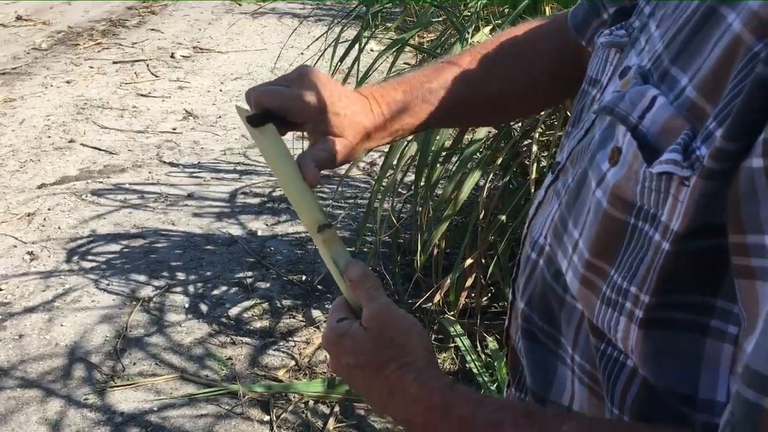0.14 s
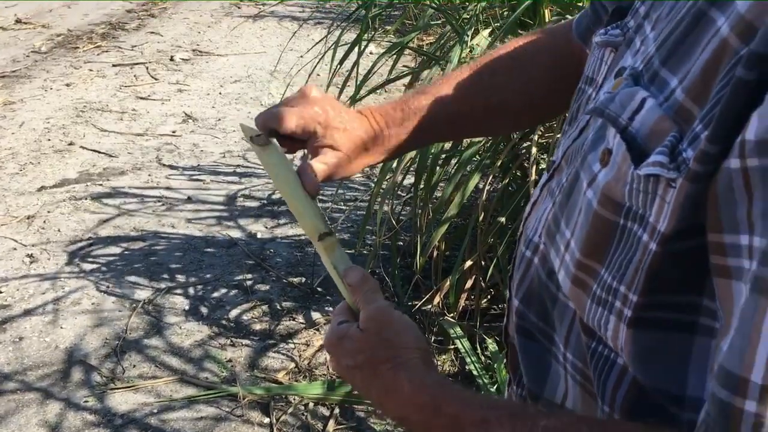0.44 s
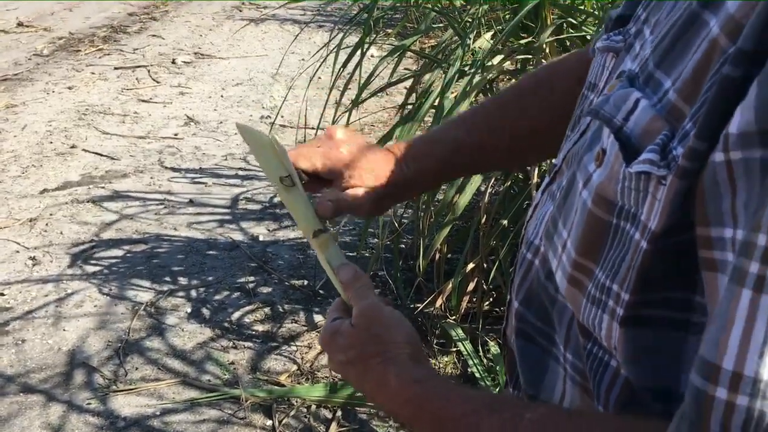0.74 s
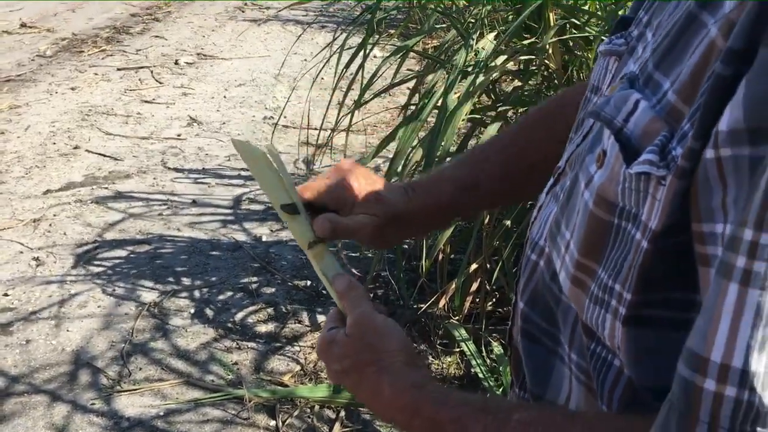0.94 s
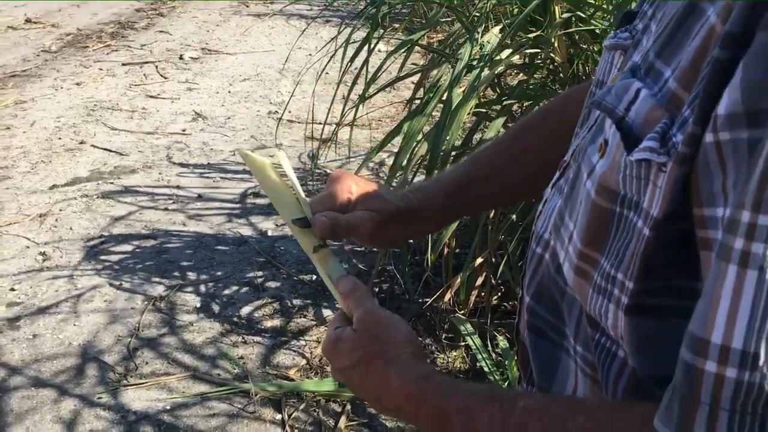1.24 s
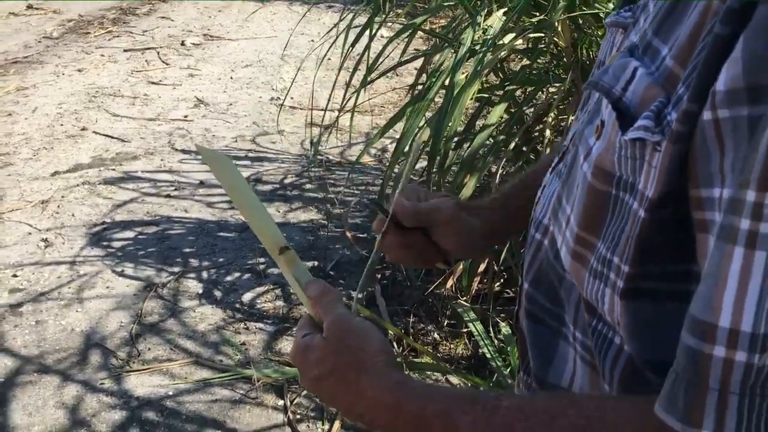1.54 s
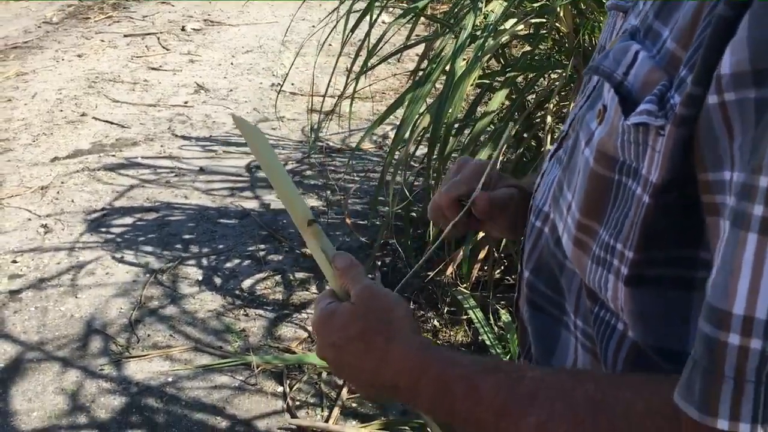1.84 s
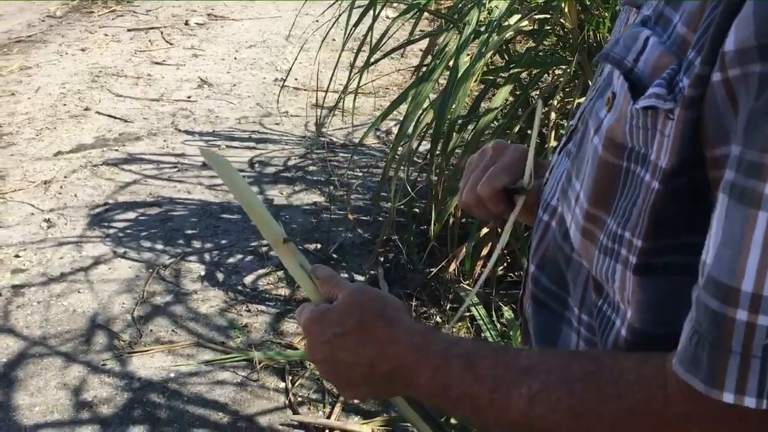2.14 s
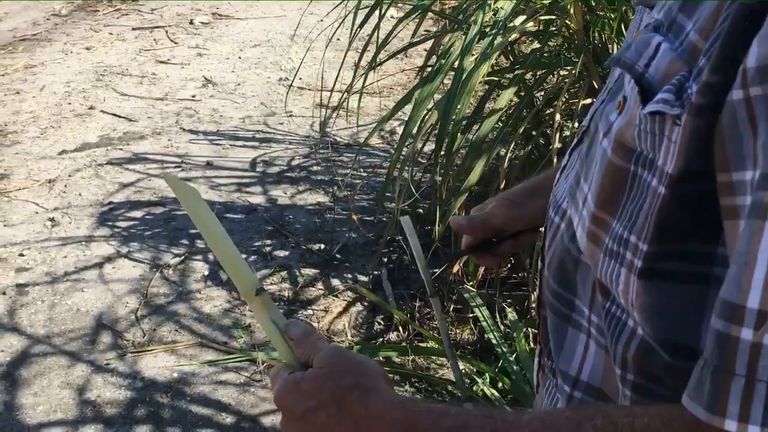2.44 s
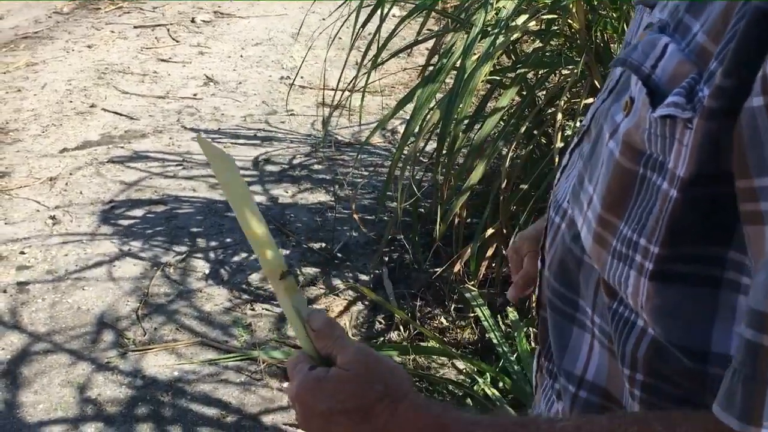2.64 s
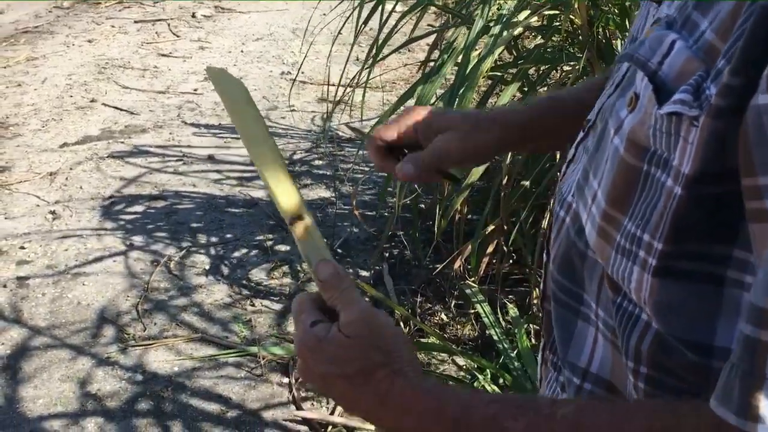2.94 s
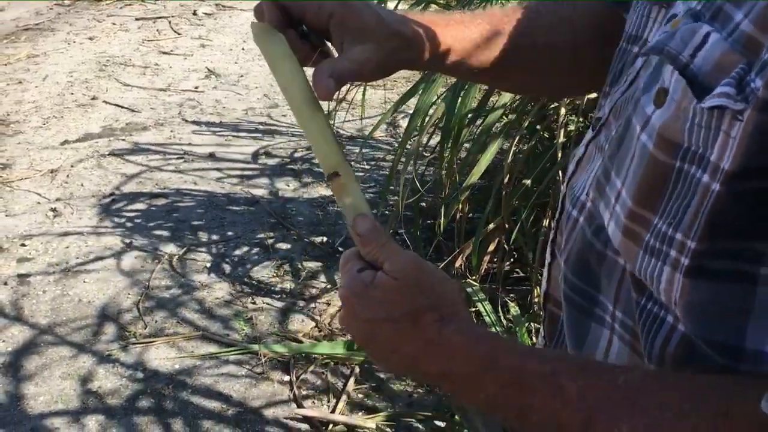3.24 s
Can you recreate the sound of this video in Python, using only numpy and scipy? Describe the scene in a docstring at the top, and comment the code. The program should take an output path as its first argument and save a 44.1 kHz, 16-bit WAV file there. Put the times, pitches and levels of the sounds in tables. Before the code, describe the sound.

A small knife peels sugarcane, hard rind fibres snapping and tearing in bursts, with woody knocks outdoors.

```python
"""A small knife peels a sugarcane stalk outdoors, close to the microphone.
A slowly rising low hum, faint hiss, stray ticks and rustling sleeves and leaves run throughout.
Rind fibres snap, the blade slices under the hard rind with a rasp, and stalk and strip knock.
The strip splits away in denser runs of snaps with woody notes and a thin squeak.
It tears free with a twang and is tossed onto dry litter with hard knocks and more twangs."""
import sys
import numpy as np
from scipy import signal
from scipy.fft import rfft, irfft, next_fast_len
from scipy.io import wavfile
from scipy.ndimage import map_coordinates

SR = 44100
rng = np.random.default_rng(int(sys.argv[2]) if len(sys.argv) > 2 else 0)


def pcm_store(signal):
    """Save signal as 16-bit PCM."""
    levels = np.round(np.clip(np.atleast_2d(signal), -1, 1) * 32767)
    wavfile.write(sys.argv[1], SR, levels.astype(np.int16).T)


N = 149940
CUTOFF_HZ = 16200   # top of the microphone's range


def from_db(db):
    """Decibels to gain."""
    return 10 ** (np.asarray(db) / 20)


def rms_one(x):
    """Scale to unit rms."""
    return x / np.sqrt(np.mean(x ** 2) + 1e-20)


def clock():
    """Time of every sample, in seconds."""
    return np.arange(N) / SR


def drift(rate_hz):
    """Random wander of spread 1: noise through two equal low-pass poles at rate_hz."""
    step = 40   # samples between drawn points
    pole = np.exp(-2 * np.pi * rate_hz * step / SR)
    noise = rng.standard_normal(N // step + 2002)
    slow = signal.lfilter([1], [1, -2 * pole, pole * pole], noise)[2000:]   # skip the filter's start
    return np.interp(np.arange(N) / step, np.arange(len(slow)), rms_one(slow))


def causal(gain, size):
    """The minimum-phase response with this gain, folded from the cepstrum."""
    cepstrum = irfft(np.log(gain + 1e-9), size)
    cepstrum[1:size // 2] *= 2
    cepstrum[size // 2 + 1:] = 0
    return np.exp(rfft(cepstrum))


def colour(x, points, tilt_db=0):
    """Causal filter through (Hz, dB) points, tilted per octave; keeps the power of white noise."""
    size = next_fast_len(len(x), real=True)
    hz, db = np.transpose(points)
    octaves = np.log2(np.maximum(np.fft.rfftfreq(size, 1 / SR), 1))
    curve_db = np.interp(octaves, np.log2(hz), db + tilt_db * np.log2(hz))
    steep_top = np.sqrt(1 + (2 ** octaves / CUTOFF_HZ) ** 60)
    gain = rms_one(from_db(curve_db) / steep_top)
    return irfft(rfft(x, size) * causal(gain, size), size)[:len(x)]


def add(out, s, sound):
    """Mix a sound in at time s."""
    start = max(int(s * SR), 0)
    out[start:start + len(sound)] += sound[:max(N - start, 0)]


def grains(rate_per_s, spread_db, smooth, size):
    """Tiny fibre clicks of uneven strength on a share of smooth friction noise."""
    happens = rng.random(size) < rate_per_s / SR
    strength = from_db(spread_db * np.minimum(rng.exponential(1, size), 4))
    clicks = happens * strength * rng.choice([-1, 1], size)
    return rms_one(rms_one(clicks) + smooth * rng.standard_normal(size))


# Spectrum of the outdoor air around the microphone. Each row: frequency in Hz, level in dB.
AIR_COLOUR = [(20, -44), (38, -1), (65, 8), (90, 2.5), (125, -6), (170, -14), (300, -15.5), (700, -25.5),
              (1300, -22), (2200, -23.5), (3200, -25.5), (6000, -31), (10000, -28), (15500, -31)]
AIR_DB = -55.5
HUM_HZ, HUM_DB, HUM_RISE_DB_PER_S = 99, -55.5, 1.65   # the level is reached halfway through


def background():
    """A low hum wavering in pitch and level, in noise shaped as rumble and faint outdoor hiss."""
    phase = 2 * np.pi * np.cumsum(HUM_HZ + 0.57 * drift(6.4)) / SR
    rise_db = HUM_RISE_DB_PER_S * (clock() - clock().mean())
    hum = np.sqrt(2) * np.sin(phase) * from_db(HUM_DB + rise_db + 0.63 * drift(14))
    return hum + from_db(AIR_DB) * colour(rng.standard_normal(N), AIR_COLOUR)


# Spectrum of stray ticks and of the later knocks. Each row: frequency in Hz, level in dB.
KNOCK_COLOUR = [(60, -23), (160, -18), (330, -16), (750, -15), (1200, -5.5), (2300, 4), (2900, -4.5),
                (4000, -1.5), (5500, -1), (8300, 3), (10500, -5), (12500, -4), (15500, -21)]
STRAY_TICKS_PER_S, STRAY_DB, STRAY_SPREAD_DB = 160, -68, 3.5


def stray_ticks():
    """Loose fibres and dry leaves tick all the while, faintly and at random."""
    ticks = grains(STRAY_TICKS_PER_S, STRAY_SPREAD_DB, smooth=0, size=N)
    return from_db(STRAY_DB) * colour(ticks, KNOCK_COLOUR, tilt_db=-0.5)


# Sleeves, leaves and the loose strip rustle as the arm moves. Each row: peak in seconds,
# level in dB, rise in seconds, fall in seconds, tilt in dB per octave.
RUSTLES = [(.16, -51.5, 0.12, 0.15, 1.8), (.34, -51, 0.063, 0.065, 1.5), (.351, -49, 0.011, 0.0046, 8),
           (.845, -59.5, 0.039, 0.026, -0.5), (1.17, -63.5, 0.018, 0.028, 3),
           (1.368, -54.5, 0.024, 0.028, 4), (1.437, -47.5, 0.019, 0.02, 7), (1.608, -48, 0.052, 0.047, 4),
           (1.69, -51.5, 0.0084, 0.047, 2.5), (1.85, -48, 0.068, 0.13, 2.5), (2.019, -47.5, 0.04, 0.028, 2),
           (2.305, -49.5, 0.094, 0.065, 0.5), (2.409, -49.5, 0.016, 0.15, 2.5),
           (2.72, -44.5, 0.12, 0.096, 2), (2.736, -37.5, 0.033, 0.024, 1), (2.778, -40.5, 0.014, 0.022, 2),
           (2.899, -38.5, 0.026, 0.038, 3), (3.01, -50.5, 0.074, 0.17, 1.5),
           (3.204, -41.5, 0.011, 0.021, 2.5), (3.371, -59, 0.073, 0.093, 3)]
# Spectrum of a rustle. Each row: frequency in Hz, level in dB.
RUSTLE_COLOUR = [(120, -4.5), (300, -4.5), (690, -2), (950, -1.5), (1600, 0), (2280, 5.5), (2800, 1),
                 (4200, -1.5), (5400, -3), (7000, -5.5), (9300, -4.5), (10500, -8.5), (12500, -11.5),
                 (15500, -21)]
RUSTLE_GRAINS_PER_S = 1700


def rustles(size=32768):
    """Each movement swells and fades as a soft crackle of fibre clicks and friction noise."""
    out, t = np.zeros(N), (np.arange(size) - size // 2) / SR   # t = 0 at the peak
    for s, db, rise, fall, tilt_db in RUSTLES:
        shape = from_db(db) / (1 + (t / np.where(t < 0, rise, fall)) ** 2 / 2) ** 2
        crackle = grains(RUSTLE_GRAINS_PER_S, spread_db=3.0, smooth=0.79, size=size)
        sound = colour(shape * crackle, RUSTLE_COLOUR, tilt_db)
        add(out, s + t[0], sound[s + t >= 0])
    return out * from_db(1.9 * drift(36))


def patchy(x, depth_db, rate_hz, count=12):
    """Each band flickers by itself, by depth_db, as different fibres catch."""
    spectrum, hz = rfft(x), np.fft.rfftfreq(N, 1 / SR)
    centres_hz = np.geomspace(600, 15000, count)
    out = np.zeros(N)
    for weights in np.eye(count):   # overlapping bands that sum to the whole
        band = irfft(spectrum * np.interp(hz, centres_hz, weights), N)
        out += band * from_db(depth_db * np.clip(drift(rate_hz), -2, 2))
    return out


# Resonances of the stalk under knocks and rubbing. Each row: frequency in Hz, width in Hz,
# level in dB against the direct sound it is added to.
STALK_MODES = [(700, 56, 3.5), (2300, 130, -10), (4340, 69, -4.5), (5400, 67, -4), (6050, 48, -2),
               (7200, 40, -18)]


def stalk(x):
    """The stalk rings along with whatever touches it, one resonator a mode."""
    out = x
    for hz, width, db in STALK_MODES:
        out = out + from_db(db) * signal.lfilter(*signal.iirpeak(hz, hz / width, fs=SR), x)
    return out


# Rind fibres snap close by. Each row: start in seconds, level in dB, body in dB (full below
# 4.5 kHz, none above 8.5), top in dB (none below 9 kHz, full above 12.5), decay in ms.
SNAPS = [(0.025, -40.5, 16, 4, 0.89), (0.1452, -36, 6, -13, 1.8), (0.197, -39.5, -4, -1, 1.1),
         (.6378, -45, 3, -4, 0.55), (.6528, -34, -3, 0, .8), (.7610, -37.5, 20, -16, 2.8),
         (0.847, -41.5, 9, -34, 1.9), (1.0385, -34.5, 6, -9, 1.6), (1.066, -42, 15, -5, 1.9),
         (1.3612, -44, 16, 2, 1.7), (1.4210, -34, -6, -2, 0.65), (1.4288, -19.5, 10, 8, 0.55),
         (1.4450, -29, -11, 0, 1.4), (1.461, -23.5, 13.5, 2.5, 0.81), (1.4728, -27.5, 15, 4, 0.97),
         (1.4849, -25, 2, -3, 0.9), (1.5078, -20, 14.5, -6, 2.9), (1.523, -31, 2, 7, .8),
         (1.539, -31, -6, 8, 1.5), (1.6835, -37, 15, 5, 0.85), (1.815, -31.5, 6, 3.5, 0.67),
         (1.8182, -27.5, 1, 1, 0.78), (1.8349, -30, -3, -2, 0.64), (1.8371, -28.5, 2, 4, .7),
         (1.852, -28, -11, -25, 0.65), (1.8711, -28.5, -10, -8, .5), (1.8953, -22, -12.5, -9, 0.54),
         (1.9012, -26, 14, 3, 0.71), (1.914, -27, -1, 3, 0.81), (2, -27.5, 8, 7, 0.55),
         (2.003, -29, 0, -2, .7), (2.006, -23, 3, 1.5, 0.37), (2.0098, -16, 3, 0.5, 1.1),
         (2.016, -21.5, -2, -5, 0.74), (2.0181, -33, -13, -9, 0.53), (2.0204, -19, -3, -2, 0.88),
         (2.0346, -36, 3, -5, .7), (2.043, -41, 0, -1, .6), (2.1623, -35, 7, -1, 0.59),
         (2.1861, -34, 9, 1, 0.67), (2.188, -31, 8, -1, 2.8), (2.225, -29, 6, -2, .6),
         (2.2371, -35, -4, 0, 0.59), (2.2476, -30, 0, 0, 1.2), (2.251, -19, -0.5, -1, 0.76),
         (2.2524, -19.5, 8, -8, 2.5), (2.2543, -25.5, 8, 1, 1.6), (2.266, -28, 0, -1, 1.6),
         (2.2766, -32, -4, 0, .7), (2.2872, -36, -9, 2, .9), (2.3530, -43, 13, -6, 1.2),
         (2.8762, -17, 2, -16, 0.86), (3.0275, -29, 8, 0, 1.1), (3.2785, -43.5, 5, -7, .8),
         (3.287, -43, 31, -8, 0.97)]
# Spectrum of a snap before body and top. Each row: frequency in Hz, level in dB.
SNAP_COLOUR = [(60, -35), (280, -23.5), (750, -32.5), (1400, -33.5), (2300, -19), (2900, -20.5),
               (4500, -13), (6500, -4.5), (8300, 0.5), (9500, 0), (10400, -2.5), (12500, 3), (15000, 0),
               (16500, -18)]


def snaps(size=2048):
    """A breaking fibre bursts into noise that dies in milliseconds; level is its energy over 1 ms."""
    out, t = np.zeros(N), np.arange(size) / SR
    hz, base_db = np.transpose(SNAP_COLOUR)
    body = np.interp(hz, [4500, 8500], [1, 0])
    top = np.interp(hz, [9000, 12500], [0, 1])
    for s, db, body_db, top_db, decay_ms in SNAPS:
        burst = rng.standard_normal(size) * np.exp(-t * 1000 / decay_ms)
        burst = colour(burst, np.c_[hz, base_db + body_db * body + top_db * top])
        add(out, s, from_db(db) * rms_one(burst) * np.sqrt(SR / 1000 / size))
    return out


# The blade slices along under the rind. Each row: start in seconds, length in seconds,
# starting level in dB, fade over the stroke in dB (negative grows), tilt in dB per octave.
SLICES = [(0.619, 0.066, -35, 8, -0.5), (0.95, 0.081, -60.5, -7.5, 2.5), (1.032, 0.11, -51, 0.5, 5),
          (1.517, 0.025, -42.5, 2, -3), (1.538, 0.082, -45, 1, 7), (2.256, .068, -51, -2.5, 3)]
# Spectrum of the rasp. Each row: frequency in Hz, level in dB.
SLICE_COLOUR = [(200, -16.5), (800, -17.5), (2300, -12), (3000, -12.5), (4500, -5), (6000, -1), (6700, 8),
                (7700, -7.5), (9200, 8.5), (10500, -4), (12700, 5), (15500, -8.5)]
SLICE_ATTACK_S, SLICE_RELEASE_S, SLICE_GRAINS_PER_S = 0.0028, 0.0075, 3500
SLICE_WANDER_S, SLICE_WANDER_HZ = .0004, 14   # spread and rate of the time warp


def slices(size=16384):
    """The edge parts thousands of fibres a second: an uneven rasp, its resonances wandering."""
    out, t = np.zeros(N), np.arange(size) / SR
    for s, length, db, fade_db, tilt_db in SLICES:
        shape = np.minimum(t / SLICE_ATTACK_S, 1) * np.exp(-np.maximum(t - length, 0) / SLICE_RELEASE_S)
        shape = shape * from_db(db - fade_db * np.minimum(t / length, 1))
        rasp = grains(SLICE_GRAINS_PER_S, spread_db=1.0, smooth=0.78, size=size)
        add(out, s, colour(shape * rasp, SLICE_COLOUR, tilt_db))
    # reading the sound early and late shifts its pitch as the blade travels
    warped_s = clock() + SLICE_WANDER_S * drift(SLICE_WANDER_HZ)
    out = map_coordinates(out, [warped_s * SR], order=3)
    return out * from_db(2.5 * drift(88))


# Stalk and strip knock against blade and dry litter. Each row: start in seconds, level in dB,
# swell to the peak in ms, tilt in dB per octave.
KNOCKS = [(0.7472, -46.5, 2.6, -2.5), (1.0320, -49.5, 2.4, -4.5), (1.0375, -41.5, 2.5, -3.5),
          (2.316, -35.5, 0.63, -4), (2.7060, -34, 1.35, -3.5), (2.806, -47, 1.1, 1),
          (2.839, -39.5, 2.4, -2), (2.8496, -39.5, 2.2, -2.5), (2.874, -20.5, 1.4, 2),
          (2.8803, -24.5, 0.88, 6), (2.8842, -30.5, 2.4, 2), (2.899, -28.5, 0.97, 0.5),
          (2.9065, -20.5, 0.31, -1.5), (2.9106, -25, 0.53, 1), (3.0227, -21.5, 2.72, 0.5),
          (3.027, -30.5, 1.4, -2.5), (3.1742, -39.5, 1.8, -1), (3.178, -35, 1.1, 7),
          (3.197, -26.5, 0.41, 1.5)]
KNOCK_GRAINS_PER_S = 7000


def knocks(size=4096):
    """A woody contact: a tight cluster of clicks that swells and dies."""
    out = np.zeros(N)
    for s, db, swell_ms, tilt_db in KNOCKS:
        age = np.arange(size) / SR * 1000 / swell_ms
        shape = age * np.exp(1 - age)
        cluster = grains(KNOCK_GRAINS_PER_S, spread_db=-3, smooth=1, size=size)
        burst = colour(shape * cluster, KNOCK_COLOUR, tilt_db)
        add(out, s, from_db(db) * rms_one(burst) * np.sqrt(np.mean(shape ** 2)))
    return out


# Woody notes rung by the harder contacts. Each row: start in seconds, relative level in dB,
# pitch in Hz, decay in seconds. A start past the end is not heard.
BUMPS = [(1.4290, -35.5, 2306, 0.0026), (1.4285, -20.5, 9500, 0.00097), (1.5088, -36, 1140, 0.0019),
         (1.5088, -22, 6600, 0.0011), (1.507, -46, 2100, 0.0051), (2.2520, -34, 6200, 0.0048),
         (2.334, -44, 161, 0.0058), (2.335, -41, 303, 0.0054), (2.336, -47, 670, 0.0037),
         (2.333, -40, 1450, 0.0022), (2.8755, -22.5, 5320, 0.0023), (2.877, -43, 240, 0.0077),
         (2.880, -39.5, 407, 0.0062), (3.8, -28, 3620, 0.0033), (3.033, -49, 215, 0.015),
         (3.178, -46.5, 560, 0.0041)]


def bumps(size=8192):
    """A contact rings a quickly damped note with a little scuff of noise around its pitch."""
    out, t = np.zeros(N), np.arange(size) / SR
    for s, db, hz, decay in BUMPS:
        band_hz = [hz / 2, min(hz * 2, CUTOFF_HZ)]
        band = signal.butter(2, band_hz, "band", fs=SR, output="sos")
        scuff = rms_one(signal.sosfilt(band, rng.standard_normal(size)))
        shape = np.exp(-t / decay) * (1 - np.exp(-t / 0.00074)) * 2   # onset under a millisecond
        add(out, s, from_db(db) * (np.sin(2 * np.pi * hz * t) + 0.5 * scuff) * shape)
    return out


# The blade squeaks in the moist cut. Each row: time in seconds, pitch in Hz, level in dB
# before the partials' own levels.
SQUEAK = [(1.530, 10500, -63), (1.545, 10100, -37), (1.580, 9800, -44), (1.595, 9300, -42),
          (1.615, 9700, -40.5), (1.630, 9600, -68)]
# Partials of the squeak. Each row: ratio to the pitch, level in dB.
SQUEAK_PARTIALS = [(.765, -7), (1.0, -6), (1.17, -3), (1.39, -2)]
SQUEAK_WIDTH_HZ = 290   # spread of each partial's frequency wander


def squeak():
    """A thin stick-slip whistle of a few partials, roughened by fast pitch and level wander."""
    times, pitches, levels = np.transpose(SQUEAK)
    hz, db = np.interp(clock(), times, pitches), np.interp(clock(), times, levels)
    sounding = (clock() > times[0]) & (clock() < times[-1])
    partials = np.zeros(N)
    for ratio, partial_db in SQUEAK_PARTIALS:
        level = from_db(partial_db + 2.0 * drift(120))
        phase = 2 * np.pi * np.cumsum(ratio * hz + SQUEAK_WIDTH_HZ * drift(194)) / SR
        partials += level * np.sin(phase)
    return partials * from_db(db) * sounding


# The springy strip twangs when it flicks or lands. Each row: start in seconds, peak level in dB,
# start pitch in Hz, swell to the peak in ms.
TWANGS = [(2.2505, -48, 1290, 4.94), (2.8757, -31, 2260, 2.1), (3.025, -36.5, 1430, 2.04)]
TWANG_SAG_PER_SWELL = .25   # the period grows by this share of its start over each swell time


def twangs(size=4096):
    """Bending waves run along the strip, the low ones slowest: a short falling chirp."""
    out = np.zeros(N)
    for s, db, hz, swell_ms in TWANGS:
        age = np.arange(size) / SR * 1000 / swell_ms
        phase = 2 * np.pi * np.cumsum(hz / (1 + TWANG_SAG_PER_SWELL * age)) / SR
        add(out, s, from_db(db) * np.sin(phase) * age * np.exp(1 - age))
    return out


ECHO_S, ECHO_DB = .0049, -16.5   # reflection off the ground
TAIL_S, TAIL_DB = 0.013, -12   # scatter from ground and leaves


def surroundings(x, size=8192):
    """One close reflection and a short diffuse scatter join the direct sound."""
    t = np.arange(size) / SR
    scatter = rms_one(rng.standard_normal(size) * np.exp(-t / TAIL_S)) / np.sqrt(size)   # unit energy
    response = from_db(TAIL_DB) * scatter
    response[0] += 1
    response[int(ECHO_S * SR)] += from_db(ECHO_DB)
    return signal.fftconvolve(x, response)[:N]


def scene():
    """Cane work close by, over the background."""
    cutting = snaps() + patchy(slices(), depth_db=0.0, rate_hz=43) + squeak()   # no flicker at depth 0
    rubbing = patchy(rustles(), depth_db=3.0, rate_hz=43) + stray_ticks()
    work = cutting + stalk(knocks() + rubbing) + bumps() + twangs()
    return (surroundings(work) + background())[None]


MIC_DIP_HZ, MIC_DIP_WIDTH_HZ, MIC_DIP_SHARE = 2800, 1080, 0.32   # share taken out at the centre


def record(dry):
    """The microphone's response dips in the presence range; the top is cut steeply."""
    dip = signal.lfilter(*signal.iirpeak(MIC_DIP_HZ, MIC_DIP_HZ / MIC_DIP_WIDTH_HZ, fs=SR), dry)
    steep_cut = signal.ellip(10, .1, 80, CUTOFF_HZ, fs=SR, output="sos")
    return signal.sosfilt(steep_cut, dry - MIC_DIP_SHARE * dip)


dry = scene()
out = record(dry)
pcm_store(out)
```